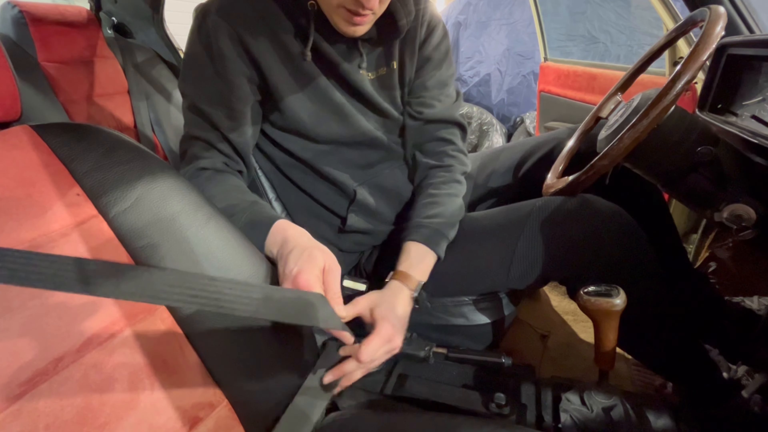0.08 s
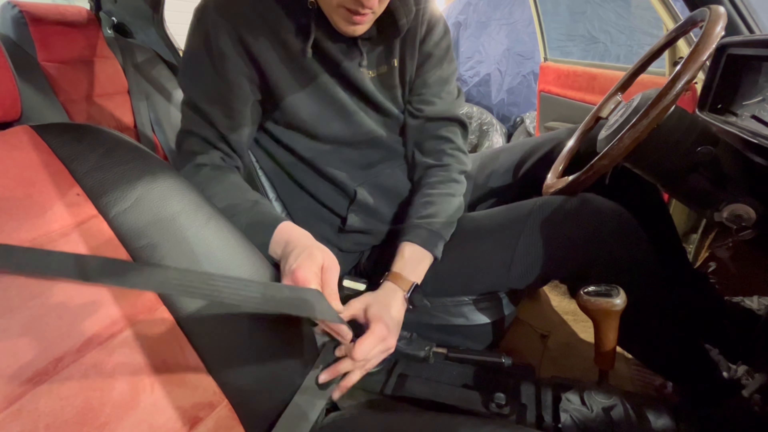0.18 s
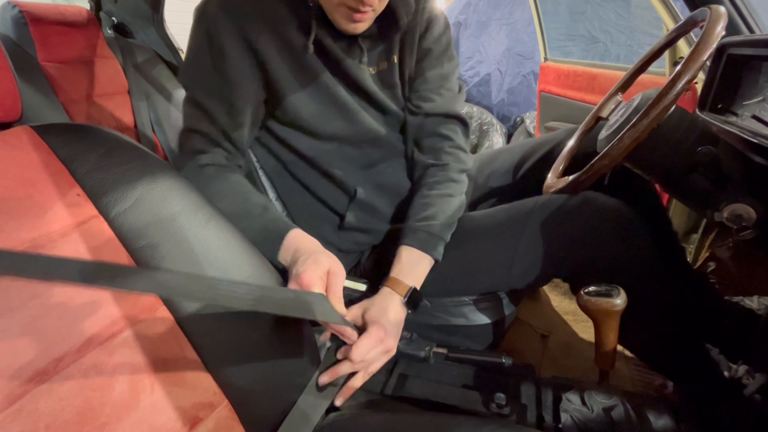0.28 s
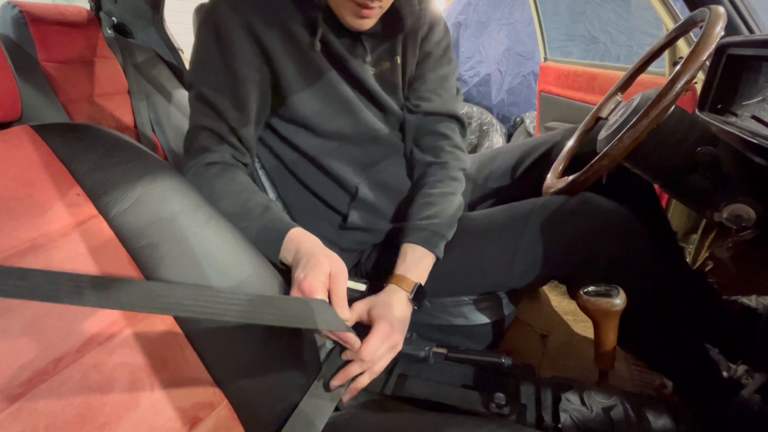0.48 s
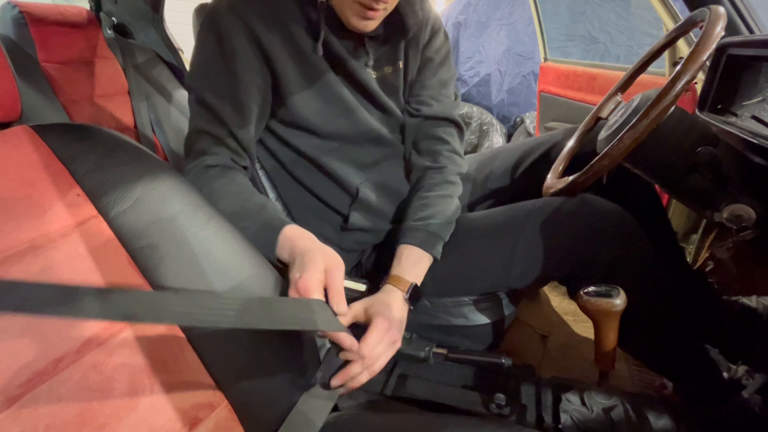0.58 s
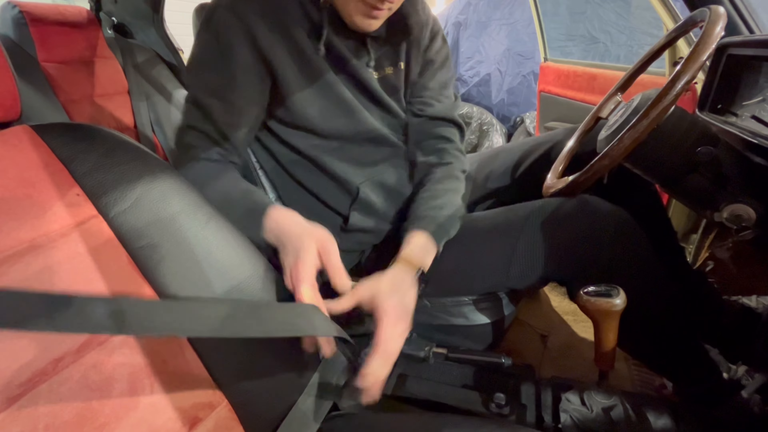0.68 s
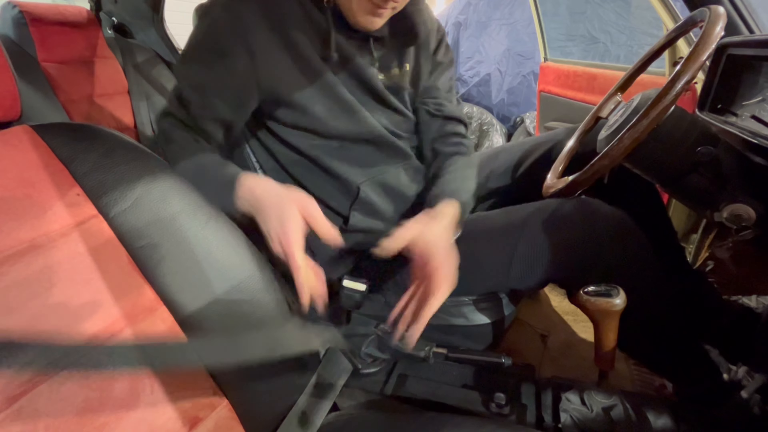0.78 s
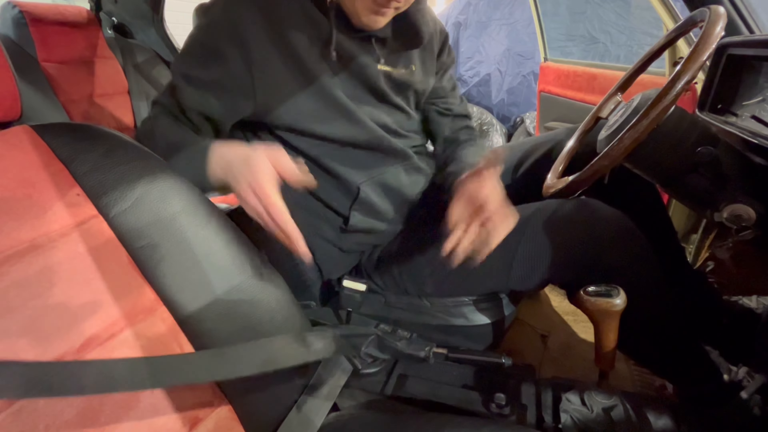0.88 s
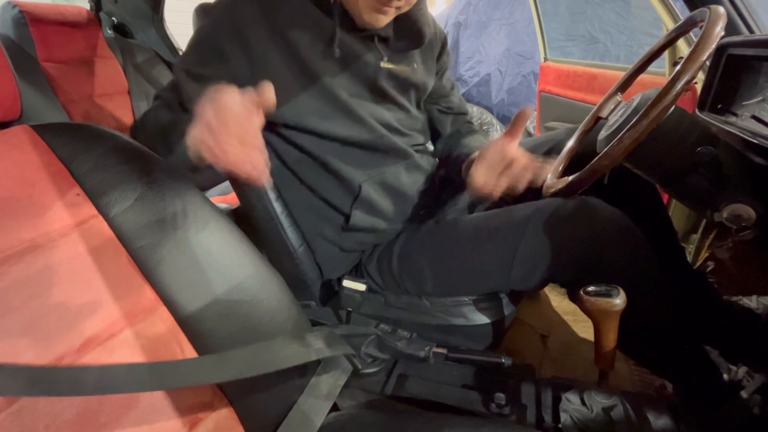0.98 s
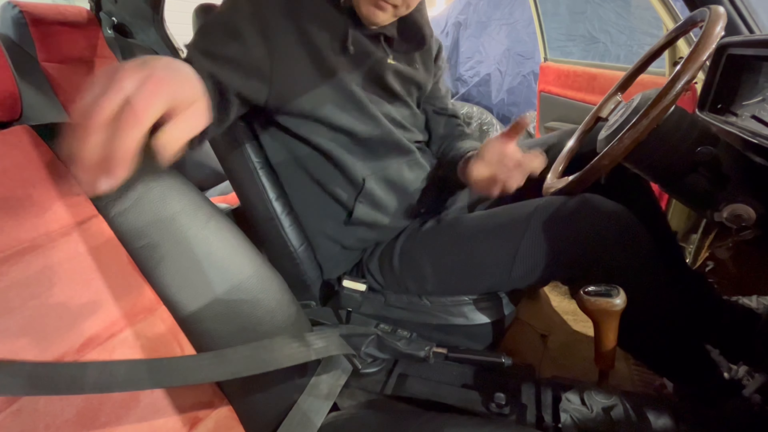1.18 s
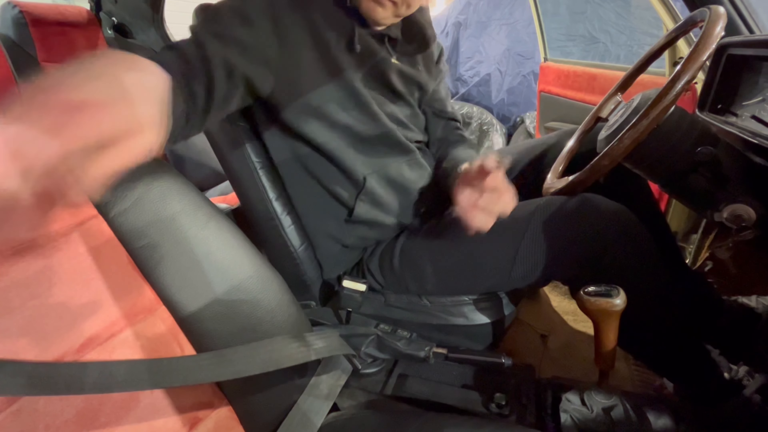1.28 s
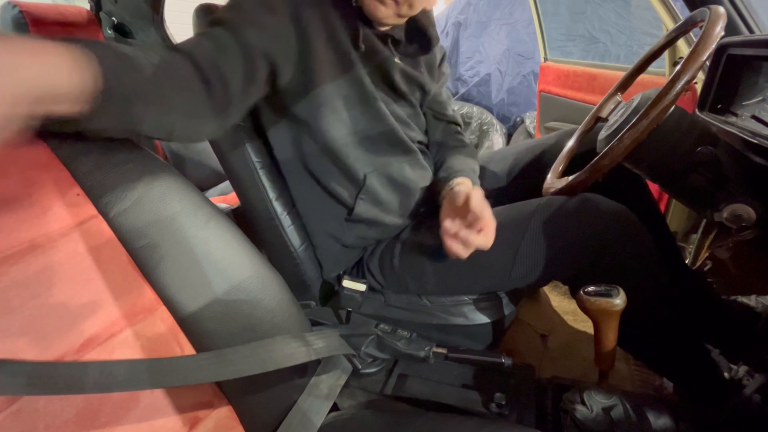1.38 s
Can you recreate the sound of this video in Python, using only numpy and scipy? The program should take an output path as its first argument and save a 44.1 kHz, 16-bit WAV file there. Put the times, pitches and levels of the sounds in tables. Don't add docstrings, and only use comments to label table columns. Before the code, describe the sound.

A seat belt is fastened in a small, dry car cabin, heard close in stereo. Cloth rustles while the tongue ticks and knocks at the slot from 0.02 to 0.16 s. At 0.2 s it is shoved in with scraping knocks and a low seat boom; at 0.3 s the latch snaps sharply and bounces. Faint ticks and pats follow around 0.4-0.5 and 0.8-0.9 s, fading into quiet hum.

```python
import sys
import numpy as np
from scipy import signal
from scipy.fft import rfft, irfft
from scipy.io import wavfile
from scipy.ndimage import uniform_filter1d

SR = 44100
rng = np.random.default_rng(int(sys.argv[2]) if len(sys.argv) > 2 else 0)


def convert_level_to_amplitude(level_db):
    exponent = np.asarray(level_db, float) / 20
    return 10 ** exponent


def output_pcm(signal):
    pcm = np.clip(np.atleast_2d(signal).T, -1, 1) * 32767
    wavfile.write(sys.argv[1], SR, np.round(pcm).astype(np.int16))


N = 61740

# (frequency [Hz], level [dB per Hz])
HUM_COLOUR = [(40, -3), (80, -2.5), (180, -7.5), (350, -26), (600, -21), (1200, -2.5), (2600, -23.5),
              (4000, -32)]
# (frequency [Hz], level [dB per Hz])
MIC_COLOUR = [(1500, -28), (3500, -9.5), (6000, 0.5), (9500, -6.5), (12800, -3), (15500, -15.5)]
# (time [s], rustle level [dB], swish of sliding cloth [dB])
MOVEMENT = [(0, -52, -6), (.09, -45.5, -3.5), (0.187, -48.5, -3), (.25, -44, -13), (0.342, -41, -12),
            (.41, -49.5, -8.5), (0.559, -57.5, -8.5), (0.638, -62, 0), (0.741, -62.5, 1),
            (.79, -61.5, -2.5), (.84, -63, -4), (0.951, -79.5, 6), (1.07, -74.5, 4.5),
            (1.148, -69.5, -16.5), (1.342, -76, 1), (1.39, -75.5, 10.5)]
# (frequency [Hz], level [dB per Hz])
CLOTH_COLOUR = [(250, -19.5), (550, -7.5), (1400, -4.5), (3000, -20), (6000, -23), (9500, -34.5)]
# (frequency [Hz], level [dB per Hz])
SWISH_COLOUR = [(3000, 2.5), (6000, 0), (9500, -4), (12500, -4), (14500, -8.5), (15600, -20.5)]
# (frequency [Hz], likeness [-1 to 1])
LEFT_RIGHT_LIKENESS = [(150, 0.99), (550, -0.053), (1600, -0.21), (5000, 0.45), (9500, -0.17),
                       (12500, 0.056)]
# (frequency [Hz], left minus right [dB])
HISS_BALANCE = [(100, -6.5), (950, 5), (3800, 6), (15000, -4)]

# (frequency [Hz], level [dB], time to fall 60 dB [s])
SEAT_TONES = [(46.7, -8.5, 0.32), (90.8, -7, 0.33), (124, -16, 0.2), (155.4, -8.5, 0.083),
              (182.5, -14, 0.091), (222, -8.5, 0.062), (337, -9.5, 0.097)]
# (time [s], level [dB], extra level of the upper tones [dB])
SEAT_PUSHES = [(0.076, -35.5, 3.5), (0.133, -36.5, 9.5), (0.213, -34.5, 22.5), (0.228, -28.5, 14),
               (.243, -21, 7.5), (0.274, -31.5, 12.5), (0.309, -38, 20), (0.334, -45.5, 22.5),
               (0.44, -38.5, 14), (0.475, -36.5, 1.5), (0.547, -35, -6.5), (0.639, -44, -12),
               (0.7439, -38, -38), (0.7983, -45, 7), (0.838, -61, 7), (1.042, -47, -7), (1.178, -50.5, 2.5)]

# (time [s], housing level [dB], metal level [dB], bright level [dB], scrape length [s])
FUMBLES = [(.0228, -31.5, -33.5, -64, 0.00058), (.0741, -28.5, -25.5, -47, 0.00035),
           (.0775, -29, -43, -46, 0.0028), (.0897, -39, -29.5, -58, 0.0005),
           (.0915, -26, -27.5, -37, 0.0018), (.0965, -33.5, -52, -61, 0.002), (.1057, -33, -23, -33, 0.004),
           (.1125, -35, -50, -52, .002), (.122, -42, -52, -70, 0.0036), (.158, -62, -34, -35.5, 0.003),
           (.435, -42, -31, -39, 0.0038), (.4595, -68.5, -53, -63, 0.00084),
           (.509, -53, -41, -46.5, 0.0034), (.877, -48, -40.5, -73, 0.0013)]
# (frequency [Hz], level [dB], time to fall 60 dB [s])
LOOSE_TONES = [(490, -13, .025), (650, -11, .025), (1150, -2, .018), (1450, -1, .016), (1670, 2, .02),
               (1950, -4, .012), (2300, -8, .008), (3300, -6, .008), (4400, -4, .008), (5200, -2, .01)]
# (time [s], housing level [dB], metal level [dB], bright level [dB], scrape length [s])
HAND_PATS = [
    (.079, -27, -68.5, -75, 0.0032),
    (.128, -32.5, -83, -65, 0.0098),
    (.17, -38.5, -70, -70, 0.0058),
    (.39, -47, -70, -62, 0.015),
    (.443, -37, -66, -71.5, 0.0018),
    (.515, -41.5, -73, -73, .005),
    (.7998, -47.5, -57, -64, 0.0019),
    (.8045, -57.5, -53.5, -52.5, 0.0058),
    (.815, -47, -45.5, -57, 0.012),
]
# (frequency [Hz], level [dB], time to fall 60 dB [s])
COVER_TONES = [(229, 0, 0.15), (327.6, -12.5, .04), (407, -3, 0.055), (502, 0, .03), (652, -4.5, 0.027),
               (910, -7, 0.0067), (1452, -11, 0.013), (2210, -17, 0.0046), (4460, 1.5, 0.035)]
# (time [s], housing level [dB], metal level [dB], bright level [dB], scrape length [s])
SHOVE_HITS = [
    (.2038, -19, -49, -35, 0.0011),
    (.2085, -13, -29.5, -23, 0.0015),
    (.2105, -22.5, -24.5, -20.5, 0.006),
    (.2142, -26, -28, -35.5, .003),
    (.2178, -13, -33, -44.5, .002),
    (.2205, -17.5, -34, -41.5, 0.0015),
    (.2255, -21, -33, -37.5, .002),
    (.2268, -22, -25, -35.5, .003),
    (.2305, -30, -26, -35, .003),
    (.238, -20.5, -43.5, -48, .004),
]
# (frequency [Hz], level [dB], time to fall 60 dB [s])
HOUSING_TONES = [(340, -11, .04), (533, -6, 0.035), (775, -7, 0.028), (964, 0, 0.028), (1085, 2, 0.018),
                 (1165, -4, 0.022), (1520, -5, .014), (1680, -5, 0.018), (2060, 3, .015), (2550, 5, 0.008),
                 (3200, 7, 0.015), (3840, 4, 0.012), (4700, 0, .01), (5590, -2, 0.015)]
# (time [s], housing level [dB], metal level [dB], bright level [dB], scrape length [s])
SNAP_HITS = [(.3025, -13, -10.5, -10.5, 0.0053), (.3048, -13, -17.5, -11.5, 0.0029),
             (.3057, -14.5, -12, -20, 0.00075), (.30665, -9, -12, -22.5, 0.003),
             (.3076, -7.5, -7, -27, 0.003), (.3103, -20, -15.5, -19.5, 0.0029),
             (.3145, -22, -17, -37, 0.004), (.3205, -24, -35, -40.5, .003), (.325, -26, -26, -51, 0.0022),
             (.3285, -29.5, -32.5, -46.5, 0.0024), (.3325, -24, -30, -50.5, 0.0013)]
# (frequency [Hz], level [dB], time to fall 60 dB [s])
LATCH_TONES = [(535, -8, 0.03), (1155, 0, 0.026), (1480, -9, 0.025), (1595, -4, 0.028), (1750, -9, 0.01),
               (2075, -1, 0.016), (2530, -5, 0.012), (3170, 5, 0.015), (3280, -4, 0.04), (3695, -8, .015),
               (4078, -6, .022), (4940, -7, 0.02), (5700, -8, 0.012), (6720, -10, .012)]
# (frequency [Hz], level [dB])
CONTACT_BRIGHTNESS = [(3000, -15), (6000, 3.5), (8200, -0.5), (10000, -2.5), (12000, 2), (14500, -6.5),
                      (16000, -23)]

# (frequency [Hz], side minus mid [dB])
BUCKLE_WIDTH = [(300, -5), (1200, -2.5), (3000, -3), (6000, 1), (10000, 0), (14000, -5)]
# (frequency [Hz], in-phase share of the side sound [-1 to 1])
BUCKLE_IN_PHASE = [(300, -.1), (700, .12), (1300, .1), (2400, .25), (4400, .3), (8000, -.15), (15000, -.1)]
# (frequency [Hz], time to fall 60 dB [s])
CABIN_DECAY = [(300, 0.03), (1200, 0.11), (4000, 0.058), (12000, 0.012)]


def evened(x):
    return x / np.sqrt(np.mean(x ** 2) + 1e-20)


def read(points, hz):
    f, value = np.transpose(points)
    return np.interp(np.log(hz + 1), np.log(f + 1), value)


def add(mix, s, sound):
    part = mix[..., round(s * SR):][..., :sound.shape[-1]]
    part += sound[..., :part.shape[-1]]


def above(x, hz):
    return signal.sosfilt(signal.butter(3, hz, "high", fs=SR, output="sos"), x)


def ring(tones, seconds):
    t = np.arange(round(seconds * SR)) / SR
    out = np.zeros(len(t))
    for k, (hz, db, t60) in enumerate(tones):
        out += (-1) ** k * convert_level_to_amplitude(db - 60 * t / t60) * np.sin(2 * np.pi * hz * t)
    return out


def hiss(colour, patchy_db, flicker_db, size=512):
    frames, hz = 4 * N // size + 5, np.fft.rfftfreq(size, 1 / SR)
    a, b, c, d, patches = rng.standard_normal((frames, len(hz), 5)).T
    patches = uniform_filter1d(patches, size=4096 // size, axis=1)
    patches = evened(uniform_filter1d(patches, size=size // 64, axis=0))
    flicker = evened(uniform_filter1d(rng.standard_normal(frames), size=3))
    like = np.clip(read(LEFT_RIGHT_LIKENESS, hz), -1, 1)[:, None]
    left, other = a + 1j * b, c + 1j * d
    right = like * left + np.sqrt(1 - like ** 2) * other
    tilt = convert_level_to_amplitude(read(HISS_BALANCE, hz)[:, None] / 2)
    z = np.array([left * tilt, right / tilt])
    bass_cut = np.minimum(hz / colour[0][0], 1) ** 3
    level = read(colour, hz)[:, None] + patchy_db * patches + flicker_db * flicker
    z *= convert_level_to_amplitude(level) * bass_cut[:, None]
    return evened(signal.istft(z, nperseg=size, noverlap=3 * size // 4)[1][:, :N])


def cabin_hum():
    return convert_level_to_amplitude(-62) * hiss(HUM_COLOUR + [(6000, -62.0)], 1.7, 0.98, size=2048)


def microphone_hiss():
    return convert_level_to_amplitude(-77) * hiss(MIC_COLOUR, 1.2, .4)


def rustle():
    s, db, swish_db = np.transpose(MOVEMENT)
    t = np.arange(N) / SR
    grains = convert_level_to_amplitude(1.1 * np.minimum(rng.exponential(1, N), 4))
    grains *= rng.random(N) < 500 / SR
    grit = 1 + 0.014 * signal.lfilter([1], [1, -.985], grains)
    cloth = hiss(CLOTH_COLOUR + [(15000, -69)], 3.9, 0.46)
    swish = convert_level_to_amplitude(np.interp(t, s, swish_db)) * hiss(SWISH_COLOUR, 2.2, 2.4)
    return convert_level_to_amplitude(np.interp(t, s, db)) * (cloth + swish) * evened(grit)


def seat_sway():
    s, db, _ = np.transpose(MOVEMENT)
    noise = rng.standard_normal((2, N + 8000))
    a, b = signal.oaconvolve(noise, ring(SEAT_TONES, .18)[None], "valid", axes=1)[:, :N]
    sway = evened(np.array([a + 0.46 * b, a - 1.4 * b]))
    sway_db, follow = -56.5, 1.5
    return sway * convert_level_to_amplitude(sway_db + follow * (np.interp(np.arange(N) / SR, s, db) + 50.5))


def contacts(rows, tones):
    rise_s, metal_hz, crunch_db = .0003, 1800, -6
    t, drive = np.arange(2000) / SR, np.zeros((3, N))
    noise = rng.standard_normal((len(rows), 3, 2000))
    for (s, housing_db, metal_db, bright_db, scrape), n in zip(rows, noise):
        burst = n * np.exp(-t / max(scrape, .0005)) * np.minimum(t / rise_s, 1)
        struck = burst[:2] / np.linalg.norm(burst[:2], axis=1)[:, None] * 0.51
        struck[:, 4] += (.8, .35)
        levels = np.array([[housing_db], [metal_db - 0.5], [bright_db]])
        add(drive, s, np.vstack([struck, burst[2]]) * convert_level_to_amplitude(levels))
    housing = ring([tone for tone in tones if tone[0] < metal_hz], .2)
    metal = ring([tone for tone in tones if tone[0] > metal_hz], .2)
    rung = signal.oaconvolve(drive[0], housing)[:N] + signal.oaconvolve(drive[1], metal)[:N]
    crunch = signal.sosfilt(signal.butter(2, (1700, 5000), "band", fs=SR, output="sos"), drive[1])
    hz = np.fft.rfftfreq(N, 1 / SR)
    bright = irfft(rfft(drive[2]) * convert_level_to_amplitude(read(CONTACT_BRIGHTNESS, hz)) * (hz / (hz + 2500)) ** 2, N)
    return rung / 2 + convert_level_to_amplitude(crunch_db) * np.linalg.norm(metal) * crunch + bright


def tongue_fumbles():
    return above(contacts(FUMBLES, LOOSE_TONES), 310)


def seat_thumps():
    out, push = np.zeros((2, N)), np.hanning(round(0.0038 * SR))
    push = push / push.sum()
    for s, db, upper_db in SEAT_PUSHES:
        upper = [(hz, tone_db + upper_db, t60) for hz, tone_db, t60 in SEAT_TONES[2:]]
        low = signal.oaconvolve(ring(SEAT_TONES[:2], 0.68), push)
        high = signal.oaconvolve(ring(upper, 0.68), push)
        add(out, s, convert_level_to_amplitude(db) * np.array([low + high, low + np.roll(high, 40)]))
    return out


def hand_pats():
    return above(contacts(HAND_PATS, COVER_TONES), 150)


def tongue_shove():
    return above(contacts(SHOVE_HITS, HOUSING_TONES), 340)


def latch_snap():
    return above(contacts(SNAP_HITS, LATCH_TONES), 880)


def cabin(x):
    taps = np.zeros((2, 8820))
    at = np.arange(40, 8800, 20) + rng.integers(0, 20, (2, 438))
    np.put_along_axis(taps, at, rng.choice([-1., 1.], at.shape), 1)
    hz, t, z = signal.stft(taps, SR, nperseg=128)
    fading = z * convert_level_to_amplitude(-60 * t / read(CABIN_DECAY, hz)[:, None])
    tail = above(signal.istft(fading, SR, nperseg=128)[1][:, :8820], 330)
    echo = signal.fftconvolve(x[None], convert_level_to_amplitude(-11) * tail / np.linalg.norm(tail[0]), axes=1)[:, :N]
    hz = np.fft.rfftfreq(N, 1 / SR)
    phase = np.arccos(np.clip(read(BUCKLE_IN_PHASE, hz), -1, 1))
    side = irfft(rfft(x) * convert_level_to_amplitude(read(BUCKLE_WIDTH, hz)) * np.exp(1j * phase), N)
    lean_db = 2
    return (np.array([x + side, x - side]) + echo) * convert_level_to_amplitude(np.array([[lean_db / 2], [-lean_db / 2]]))


def scene():
    background = cabin_hum() + microphone_hiss() + rustle()
    seat = above(seat_sway() + seat_thumps(), 51) * convert_level_to_amplitude(np.array([[-1.2], [1.2]]))
    buckle = tongue_fumbles() + hand_pats() + tongue_shove() + latch_snap()
    return background + seat + cabin(buckle)


def top_cut(x):
    return signal.sosfilt(signal.butter(12, 16570, fs=SR, output="sos"), x)


def record(dry):
    low_pass = signal.firwin(127, 15850, window=("kaiser", 7), fs=SR)
    mix = signal.oaconvolve(dry, low_pass[None], "same")
    return top_cut(mix)


dry = scene()
out = record(dry)
output_pcm(out)
```